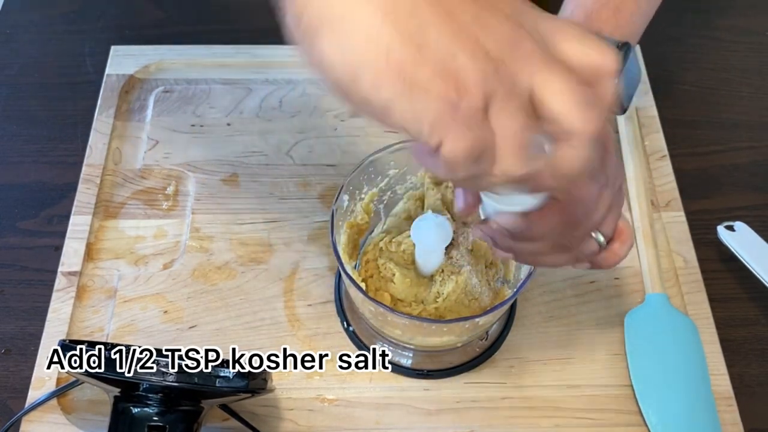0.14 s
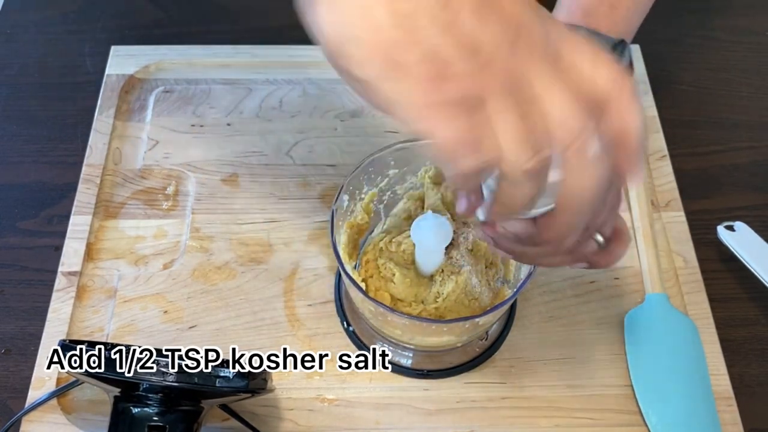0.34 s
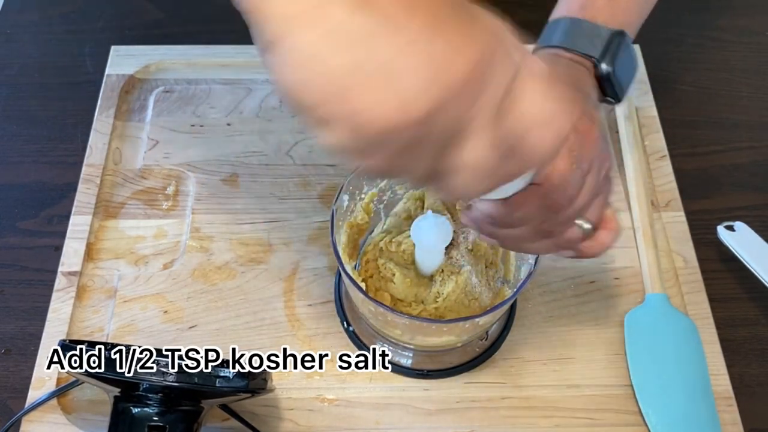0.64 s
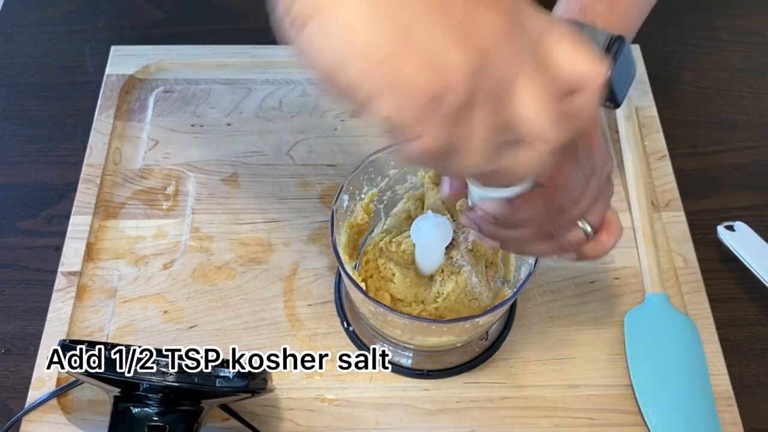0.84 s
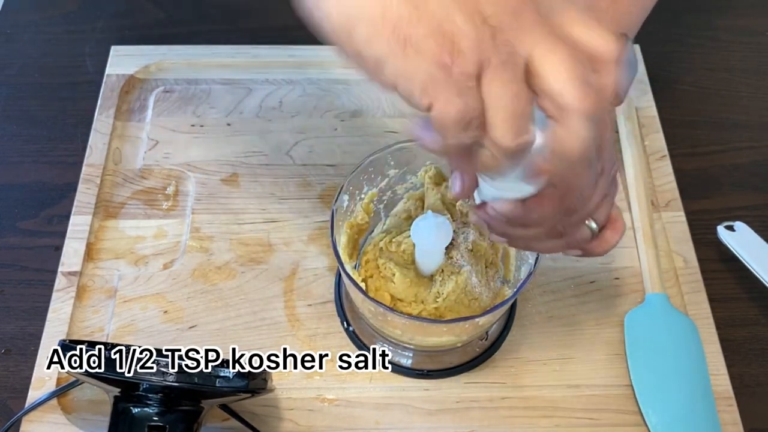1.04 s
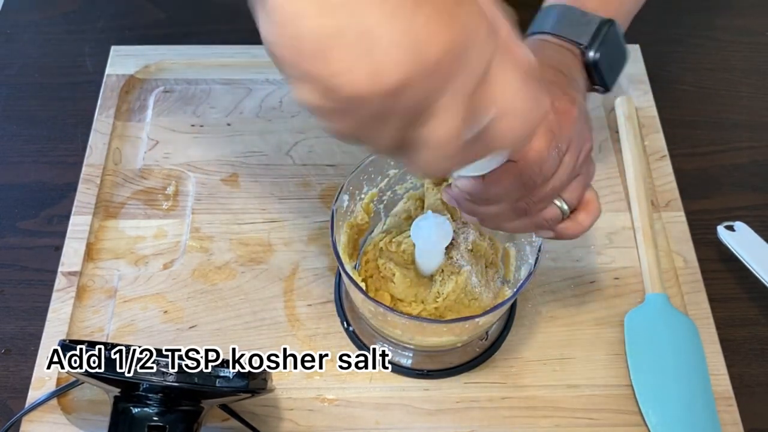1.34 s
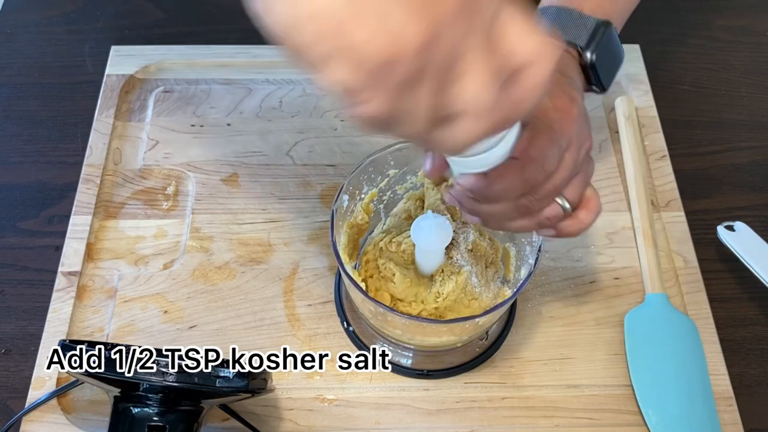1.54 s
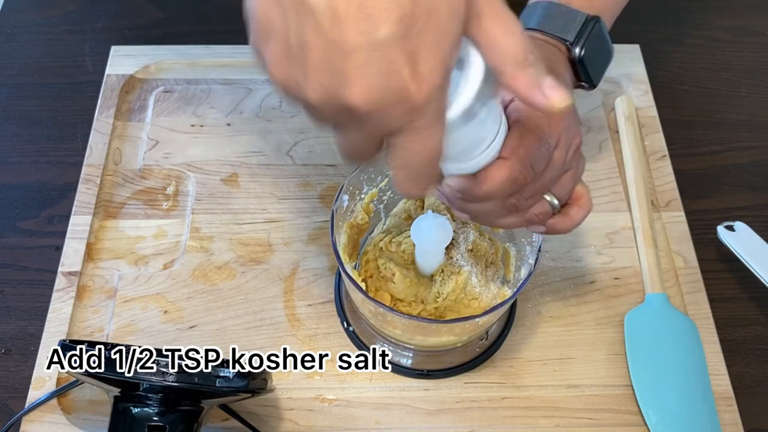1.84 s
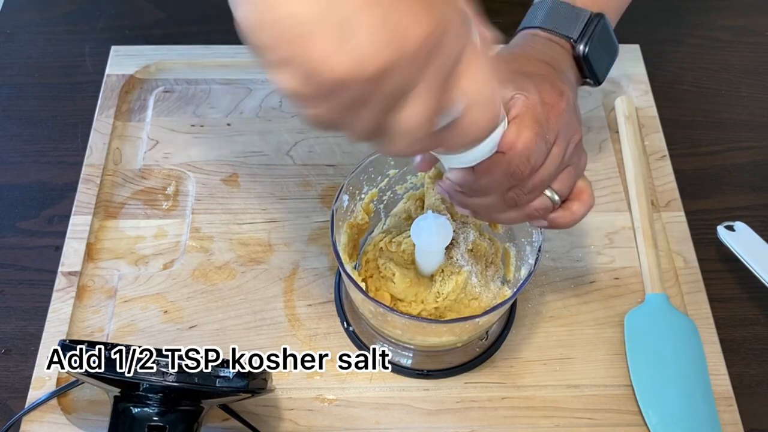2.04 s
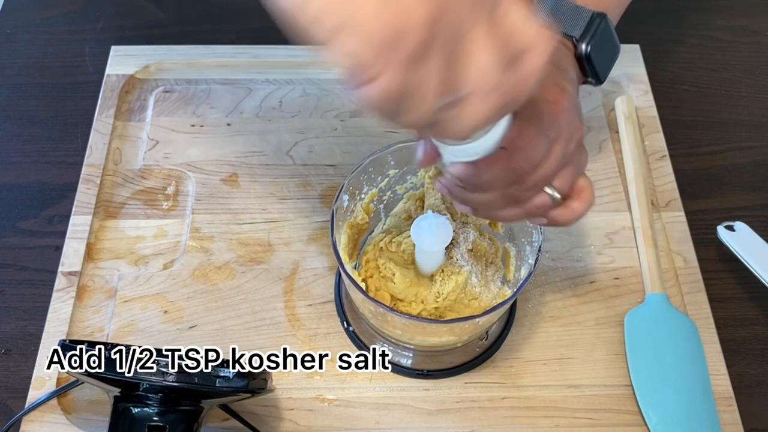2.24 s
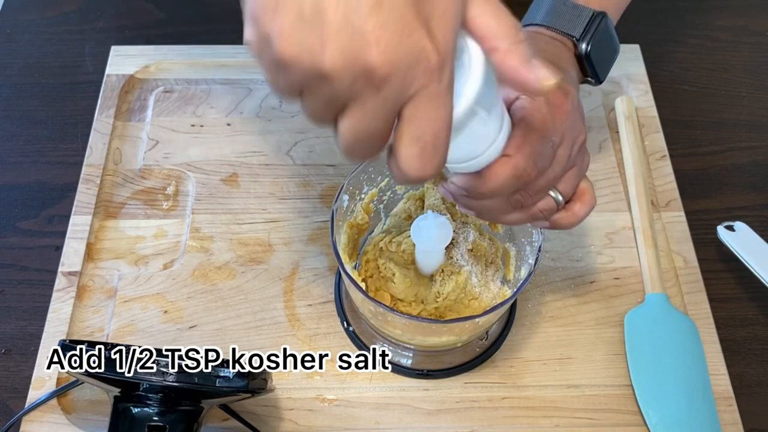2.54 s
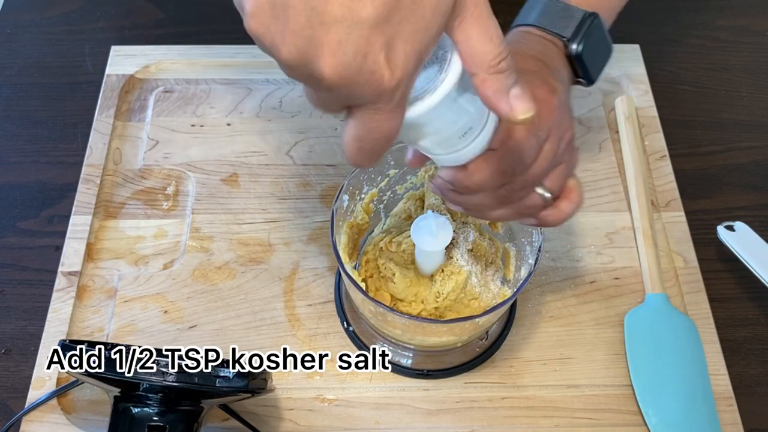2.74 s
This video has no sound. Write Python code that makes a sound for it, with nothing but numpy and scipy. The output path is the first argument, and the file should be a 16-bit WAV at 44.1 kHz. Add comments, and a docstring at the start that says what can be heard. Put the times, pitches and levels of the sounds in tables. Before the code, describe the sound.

A hand salt mill grinds from the start, the tail of one twist fading by 0.05 s. Short, dense crunches follow at about 0.2 and 0.45 s, a weak one at 0.54, then roughly every 0.22 s from 0.63 to 2.7 s. Bright crystal snaps pop throughout, a sharp one near 2.6. Hollow mid-pitched ringing, soft regrips, low hand rumble, short kitchen echoes, faint hiss; close stereo phone.

```python
"""Crystals crunch at once as a hand salt mill is twisted in quick strokes over a bowl, close under a phone.
The crunch is dense random clicks that ring the hollow mill, plus bright filtered grit.
A small kitchen adds brief echoes, low rumble and faint hiss; the working hands rumble as slow-varying noise.
Single crystals snap as short bursts, jolts ring the mill, and fingers regrip with soft thumps falling in pitch."""
import sys
import numpy as np
from scipy import signal
from scipy.fft import rfft, irfft
from scipy.io import wavfile

SR = 44100
rng = np.random.default_rng(int(sys.argv[2]) if len(sys.argv) > 2 else 0)


def wav_out(sig):
    """Save sig, one row per channel (or a flat mono array), as 16-bit PCM at SR to the path in sys.argv[1]."""
    wavfile.write(sys.argv[1], SR, np.round(np.clip(np.atleast_2d(sig).T, -1, 1) * 32767).astype(np.int16))


N = 127890  # samples in the scene
T = np.arange(N) / SR  # seconds
F = np.arange(N // 2 + 1) * SR / N  # Hz
LEFT_RIGHT = np.array([[1], [-1]])  # adds a difference signal to the left, takes it from the right


def amp(db):
    """Turn decibels into a multiplier."""
    return 10 ** (np.asarray(db) / 20)


def unit(x):
    """Scale a sound to an average (RMS) strength of 1."""
    return x / np.sqrt(np.mean(x ** 2))


def over_hz(table, f=F):
    """Read a (Hz, value) table on a log-frequency axis."""
    hz, value = np.array(table, float).T
    return np.interp(np.log(f + 1), np.log(hz + 1), value)


def colour(x, gain):
    """Filter a sound by a gain for each frequency."""
    return irfft(rfft(x) * gain, N)


def band(hz, width_hz, f=F):
    """Response of one resonance, 1 at its centre."""
    damping = 1j * f * width_hz
    return damping / (hz ** 2 - f ** 2 + damping + 1e-9)


# Ringing tones of the mill. Each row: pitch in Hz, width in Hz, level in dB before the broad body filter.
MILL_MODES = [(548, 180, -19), (798.5, 125, -6), (898.4, 119.4, 0.5), (1098, 153, -0.5), (1300, 178, -3),
              (1392, 176, -5.5), (1575, 103, -6.5), (1921, 310, -14.5), (2247, 72, -8.5), (2417, 50, -11.5),
              (2754, 273, -12.5), (3200, 264, -11.5)]


def body(f=F, low_db=0., high_db=0.):
    """Response of the hollow mill; the hand may favour or hold back its lower or upper modes."""
    total = 0
    for k, (hz, width_hz, db) in enumerate(MILL_MODES):
        held_db = low_db if hz < 850 else high_db if hz > 1300 else 0
        sign = (-1) ** k  # neighbouring modes push in opposite directions
        total = total + sign * amp(db + held_db) * band(hz, width_hz, f)
    return total * band(1405, 2080, f)


CLICKS_PER_S, SHARED = 1600, .35  # average rate; amount of clicking common to the dull and bright crunch
CLICK_SPREAD_DB, CLICK_TOP_DB = 5, 14  # average boost and largest boost of a click
RUB_DB = -3.5  # fine rub relative to the clicks


def clicks():
    """Uneven clicks at random moments over a fine rub of steady noise."""
    boost_db = np.minimum(CLICK_SPREAD_DB * rng.exponential(size=N), CLICK_TOP_DB)
    happens = rng.random(N) < CLICKS_PER_S / SR
    hits = happens * rng.standard_normal(N) * amp(boost_db)
    return unit(unit(hits) + amp(RUB_DB) * rng.standard_normal(N))


# One list of rows per grinding stroke.
# Each row: time in seconds, crunch level in dB before trims, treble in dB relative to the crunch.
STROKE_CURVES = [
    [(0.0, -29.5, -11), (0.004, -41.5, 0.5), (0.05, -48, -7.5)],
    [(0.16, -66.5, 14), (0.172, -29, -5), (0.188, -31.5, 5.5), (0.206, -25.5, -13.5), (0.216, -37.5, 0.5),
     (0.27, -49, 0.5)],
    [(0.395, -44, -2), (0.413, -30, -3), (0.449, -25, -5), (0.457, -29.5, -2.5), (0.467, -31.5, -1.5),
     (0.481, -55, 6), (0.49, -55, -4)],
    [(0.51, -48, -6), (0.524, -45.5, 13), (0.542, -42.5, 9), (0.552, -38, -22), (0.562, -54.5, 19.5),
     (0.585, -70, 6)],
    [(0.61, -52, 10), (0.618, -35.5, -6), (0.628, -39, -5.5), (0.64, -29, 1.5), (0.65, -33.5, 0.5),
     (0.676, -34.5, -4), (0.72, -46, -0.5)],
    [(0.852, -68, 21), (0.856, -44.5, -3), (0.864, -35.5, 1.5), (0.914, -32, -2.5), (0.922, -38, 5),
     (0.945, -55, -17)],
    [(1.095, -37, 8), (1.107, -29, 1), (1.125, -26, -6), (1.151, -32, -8), (1.157, -45, 13.5),
     (1.17, -62, -11)],
    [(1.32, -44, -2), (1.332, -33.5, 1.5), (1.36, -31, 0), (1.415, -50, 4.5)],
    [(1.54, -45, -4), (1.566, -24.5, -7), (1.625, -46.5, 0)],
    [(1.765, -52, -3), (1.769, -36.5, -3), (1.797, -30.5, -2), (1.805, -35, 6), (1.829, -29, -4),
     (1.88, -43.5, -1.5)],
    [(2.012, -69, 18), (2.022, -32, 1.5), (2.034, -25.5, -6.5), (2.054, -29, -6), (2.064, -29, -7),
     (2.094, -42.5, 6.5), (2.115, -50, -10)],
    [(2.245, -45.5, 1.5), (2.273, -23, -7.5), (2.289, -33, -4.5), (2.299, -26, -15), (2.319, -45, 5.5),
     (2.335, -53, -12)],
    [(2.462, -68, 18.5), (2.472, -37, -4), (2.488, -30, -0.5), (2.518, -43, 6.5), (2.54, -75, -7)],
    [(2.675, -46.5, 1), (2.691, -31, 0.5), (2.711, -30, -4), (2.717, -28.5, 1.5), (2.733, -36.5, -3.5),
     (2.77, -55, 6.5)],
]
# How the hand shapes the mill's ring, one row per stroke.
# Each row: change in dB for modes under 850 Hz, change in dB for modes over 1300 Hz.
HAND_HOLD = [(5.5, 5.5), (4.5, 4.9), (6, 3.6), (9, 0), (4, 3), (5.3, 5.3), (0.9, 2.4), (-12, 4.6),
             (-0.5, 4.2), (2, 2.3), (5.5, 0.8), (4, 0.9), (-4, 7), (-13, 2.3)]
# Colour of a breaking crystal. Each row: frequency in Hz, relative strength in dB per Hz.
GRIT_COLOUR = [(1500, -11), (2600, -14), (3500, -10), (4200, 0), (5500, -4), (6800, -2.5), (9000, -6),
               (11000, -3), (13500, -8.5), (16500, -3.5)]
EDGE_S = .005  # fade before and after each stroke


def grinding():
    """Crystals crumble as each stroke presses harder and softer: dull clicks ring the body, bright ones are grit."""
    common = clicks()
    body_strength = np.sqrt(np.mean(np.abs(body()) ** 2))
    dull = (clicks() + SHARED * common) * amp(-6.5) / body_strength
    spectrum, treble = 0, np.zeros(N)
    for rows, (low_db, high_db) in zip(STROKE_CURVES, HAND_HOLD):
        s, db, treble_db = np.array(rows, float).T
        edge = np.clip(np.minimum(T - s[0], s[-1] - T) / EDGE_S + 1, 0, 1)
        crunch = dull * edge * amp(np.interp(T, s, db))
        spectrum = spectrum + rfft(crunch) * body(F, low_db, high_db)
        treble += edge * amp(np.interp(T, s, db + treble_db))
    grit = amp(over_hz(GRIT_COLOUR))
    grit = grit / np.sqrt(np.mean(grit ** 2))
    # ten overlapping bands, each with clicks partly its own
    for hz in 2600 * 1.22 ** np.arange(10):
        bright = treble * (clicks() + SHARED * common)
        spectrum = spectrum + rfft(bright) * grit * band(hz, hz * .25) ** 2
    return irfft(spectrum, N)


# How long echoes last. Each row: frequency in Hz, seconds to fade by 60 dB.
ECHO_FADE = [(200, 0.3), (700, 0.54), (1200, 0.15), (1700, 0.51), (2200, 0.58), (2900, 0.24), (4000, 0.36),
             (8000, 0.23), (16000, 0.2)]
# How echoes differ between the ears. Each row: frequency in Hz, left-right difference relative to the shared part.
ECHO_UNLIKE = [(100, 0.31), (500, 1), (1000, 1), (3000, 0.79), (5500, 0.71), (7500, 0.086), (16000, .08)]
ROOM_DB = -9  # strength of the echoes


def room(x):
    """A tail of dense echoes, fading band by band, partly different left and right."""
    def echo_noise(hz):
        return unit(colour(rng.standard_normal(N), band(hz, hz * 0.47) ** 2)) * np.sqrt(hz / 1000)

    tail = 0
    for hz in 125 * 2. ** np.arange(0, 7.1, .5):
        mid, side = echo_noise(hz), echo_noise(hz)
        onset = np.clip(T / 0.0013, 0, 1)
        fade = amp(-60 * T / over_hz(ECHO_FADE, hz)) * onset
        tail = tail + fade * (mid + over_hz(ECHO_UNLIKE, hz) * side * LEFT_RIGHT)
    tail = amp(ROOM_DB) * tail / np.sqrt(np.mean(np.sum(tail ** 2, axis=1)))
    return signal.fftconvolve(x[None], tail[:, :SR // 2], axes=1)[:, :N]  # first half second of the tail


# Rumble of the working hands.
# Each row: time in seconds, level in dB of the deep band, level in dB of the low band before a 3 dB cut.
HAND_RUMBLE = [(0.0, -65, -65), (0.13, -69, -68.5), (0.2, -71, -49.5), (0.27, -59, -72), (0.35, -75, -67),
               (0.41, -54, -64), (0.44, -57.5, -48), (0.49, -67, -67), (0.53, -72, -44.5),
               (0.58, -61, -56.5), (0.65, -63, -43.5), (0.74, -68, -59), (0.81, -73, -62),
               (0.84, -62, -56.5), (0.92, -68, -54), (0.96, -58, -81), (1.02, -78, -78), (1.09, -61, -77),
               (1.11, -67, -49.5), (1.28, -70, -82), (1.3, -81, -59.5), (1.37, -57, -55.5),
               (1.44, -74, -79), (1.52, -75, -79), (1.59, -65, -56.5), (1.72, -73, -77), (1.81, -61.5, -50),
               (1.88, -68, -68), (1.99, -80, -65), (2.04, -66, -47.5), (2.21, -68, -82.5), (2.24, -64, -67),
               (2.29, -61, -50), (2.33, -68, -64), (2.44, -84, -78), (2.46, -64, -55.5), (2.58, -77, -73.5),
               (2.73, -62, -55.5), (2.83, -74, -76), (2.9, -89, -95)]


def hands():
    """Skin and sleeves drag on the mill and shake the board: two noise bands that rise and fall."""
    def noise(hz, width_hz):
        return unit(colour(rng.standard_normal(N), band(hz, width_hz) ** 2))

    def wide(hz, width_hz):
        return noise(hz, width_hz) + .18 * noise(hz, width_hz) * LEFT_RIGHT

    s, deep_db, low_db = np.array(HAND_RUMBLE, float).T
    deep = amp(np.interp(T, s, deep_db)) * wide(50.3, 65)
    low = amp(np.interp(T, s, low_db) - 3) * wide(293, 600)
    return deep + low


# Colour of the kitchen's background. Each row: frequency in Hz, relative strength in dB per Hz.
KITCHEN_COLOUR = [(20, -36), (35, -18), (52, -8), (100, -13), (300, -25.5), (600, -36.5), (1000, -15),
                  (4000, -26), (16000, -25)]
KITCHEN_DB = -59  # overall RMS level


def kitchen():
    """Steady rumble and faint hiss from filtered noise, nearly alike left and right in the bass."""
    gain = amp(over_hz(KITCHEN_COLOUR))
    side_share = np.clip(F / 900, .15, .5) * (F < 7000)
    mid = colour(rng.standard_normal(N), gain)
    side = colour(rng.standard_normal(N), gain * side_share)
    return amp(KITCHEN_DB) * unit(mid + side * LEFT_RIGHT)


def bursts(times, gains, decay_s, shape):
    """A blow inside a short crackle that swells and dies, filtered by shape(k, f) and set to its peak."""
    n = 4096
    out = np.zeros(N + n)
    t, f = np.arange(n) / SR, np.arange(n // 2 + 1) * SR / n
    swell = t / decay_s * np.exp(1 - t / decay_s)
    blow = 5.1 * np.exp(-2j * np.pi * f * decay_s)  # one impulse, timed at the height of the swell
    for k, (s, gain) in enumerate(zip(times, gains)):
        crackle = rfft(rng.standard_normal(n) * swell)
        burst = irfft((blow + crackle) * shape(k, f), n)
        start = int(s * SR)
        out[start:start + n] += gain * burst / np.abs(burst).max()
    return out[:N]


# Single crystals snapping. Each row: time in seconds, crack peak in dB before a trim,
# brightest frequency in Hz, body ring in dB relative to that untrimmed peak, before its own trim.
CRYSTAL_SNAPS = [(0.134, -30.5, 6600, -15), (0.1679, -26, 6740, -29), (0.2927, -28, 6300, -14),
                 (0.376, -26, 4600, -14.5), (0.4069, -36, 4090, 4), (0.4587, -23, 7340, -3.5),
                 (0.5264, -23.5, 6150, -30), (0.5394, -25, 6300, -37), (0.5636, -22, 11200, -33),
                 (0.599, -28.5, 6470, -2.5), (0.6388, -19.5, 6130, -28), (0.6693, -20.5, 4170, -2),
                 (0.7036, -24, 11300, -23), (0.7563, -20.5, 11000, -27), (0.8623, -30, 7570, -6.5),
                 (0.8723, -24.5, 4980, -9), (0.9587, -19.5, 10700, -24), (1.0032, -31.5, 11400, -30),
                 (1.0499, -28, 6300, -13), (1.0875, -18, 5430, -22), (1.1033, -17.5, 6550, -7.5),
                 (1.1184, -29.5, 6140, 4), (1.1577, -19.5, 7600, -30), (1.2166, -34, 11500, -19),
                 (1.3169, -17, 6980, -16.5), (1.3618, -27.5, 4320, 1), (1.3816, -24, 4150, -12),
                 (1.5508, -23, 7250, -26), (1.5578, -28, 4630, -6), (1.669, -33, 6150, -12),
                 (1.7388, -35.5, 7150, -10), (1.7708, -27, 4390, -3.5), (1.8224, -17.5, 7350, -10),
                 (1.8244, -17.5, 7240, -13), (1.863, -24, 5110, -12), (2.0178, -20, 10700, -21),
                 (2.0262, -29, 4320, 1), (2.0784, -29, 4260, -26), (2.0941, -27, 5000, -4.5),
                 (2.2432, -30, 11200, -18), (2.2561, -29, 4170, -9), (2.3167, -33, 4970, -14),
                 (2.4702, -23, 6040, -9.5), (2.5004, -32, 5710, 5.5), (2.5125, -42, 4380, 5),
                 (2.604, -13.5, 5700, -16.5), (2.677, -36, 5410, -16), (2.6862, -35, 7050, 2.5),
                 (2.7161, -22, 5900, -7), (2.801, -34.5, 7220, -10.5)]
# Crunches that jolt the body. Each row: time in seconds, peak in dB before a trim.
BODY_JOLTS = [(0.19, -19.5), (0.201, -24), (0.413, -25), (0.445, -24), (0.464, -24), (0.615, -20.5),
              (0.636, -22), (0.64, -31), (0.884, -22.5), (0.908, -19), (1.113, -21.5), (1.124, -20),
              (1.334, -25.5), (1.349, -28.5), (1.362, -24.5), (1.544, -36), (1.562, -25.5), (1.791, -24),
              (1.822, -34), (2.035, -22), (2.065, -25), (2.275, -24), (2.487, -27.5), (2.511, -27.5),
              (2.701, -29), (2.708, -26.5), (2.732, -23.5)]
SNAP_S, JOLT_S = .00045, .00042  # time for a burst to swell
SNAP_TRIM_DB, RING_TRIM_DB, JOLT_TRIM_DB = 3.5, 1.5, -1.5


def snaps():
    """A bright crack and the body ring it sets off; jolts ring the body alone."""
    def crack_shape(k, f):
        return (band(hz[k], 3000, f) + .45) * band(6500, 19000, f) ** 2

    s, db, hz, ring_db = np.array(CRYSTAL_SNAPS, float).T
    jolt_s, jolt_db = np.array(BODY_JOLTS, float).T
    cracks = bursts(s, amp(db + SNAP_TRIM_DB), SNAP_S, crack_shape)
    ring_gains = amp(np.r_[db + ring_db + RING_TRIM_DB, jolt_db + JOLT_TRIM_DB])
    rings = bursts(np.r_[s, jolt_s], ring_gains, JOLT_S, lambda k, f: body(f))
    return cracks + rings


# The hand regripping. Each row: time in seconds, level in dB.
REGRIPS = [(0.411, -53), (0.525, -55), (0.62, -67), (0.844, -52), (1.08, -63), (1.302, -54), (1.538, -66),
           (1.762, -53), (2.008, -72), (2.234, -51.5), (2.455, -52), (2.666, -61)]
GRIP_HZ, GRIP_END_HZ = 469, 79  # pitch at the start and the pitch it falls towards
GRIP_S = 0.00506  # time scale of the fall and of the swell


def grips():
    """Soft thumps of fingers closing on the mill: a short sine wave falling in pitch."""
    t, out = np.arange(SR // 10) / SR, np.zeros(N)
    hz = GRIP_END_HZ + (GRIP_HZ - GRIP_END_HZ) * np.exp(-t / GRIP_S)
    swell = t / GRIP_S * np.exp(1 - t / GRIP_S)
    thump = np.sin(2 * np.pi * np.cumsum(hz) / SR) * swell
    for s, db in REGRIPS:
        start = int(s * SR)
        out[start:start + len(t)] += amp(db) * thump
    return out


def scene():
    """The mill and its echoes, with the hands and the kitchen around it."""
    mill = grinding() + snaps() + grips()
    return mill + room(mill) + hands() + kitchen()


# Timing between the two ports. Each row: frequency in Hz, half cycles by which the left leads.
PORT_LEAD = [(0, 0), (1200, -.03), (2400, .15), (3900, .03), (7200, 0), (9000, -1), (11150, -2),
             (13350, -3), (15300, -4), (17000, -4.15)]
# Balance between the two ports. Each row: frequency in Hz, left over right in dB.
LEFT_OVER_RIGHT = [(60, .9), (500, .3), (1500, 1.4), (5000, .6), (8000, .1), (14000, -.2)]
TREBLE_END_HZ, TOP_DROP_DB = 15800, -27  # treble steps down over 200 Hz
LOW_CUT_HZ, TOP_HZ = 30, 16995  # bass roll-off and steep upper limit


def record(dry):
    """Two ports differ in phase and level by frequency; the treble ends in a step, then a wall."""
    lead = np.interp(F, *np.array(PORT_LEAD, float).T)
    half = np.exp(.5j * np.pi * lead) * amp(over_hz(LEFT_OVER_RIGHT) / 2)  # half the difference per side
    step = amp(TOP_DROP_DB * np.clip((F - TREBLE_END_HZ) / 200, 0, 1))
    low_cut = (1j * F / (1j * F + LOW_CUT_HZ)) ** 3
    x = colour(dry, step * low_cut * np.array([half, 1 / half]))
    return signal.sosfilt(signal.ellip(10, .2, 80, TOP_HZ, fs=SR, output="sos"), x)


dry = scene()
out = record(dry)
wav_out(out)
```